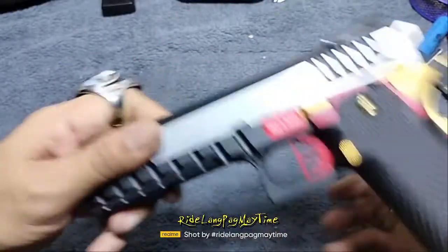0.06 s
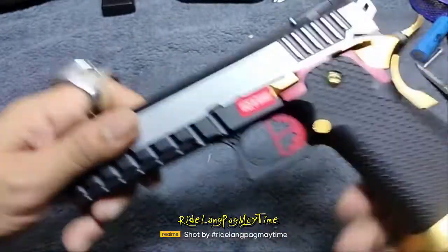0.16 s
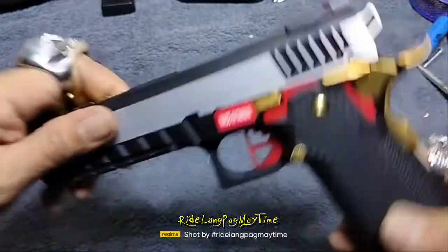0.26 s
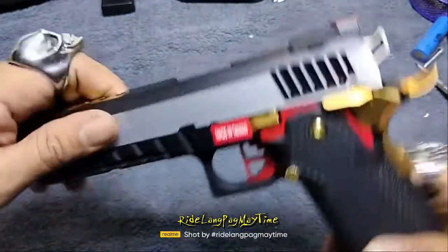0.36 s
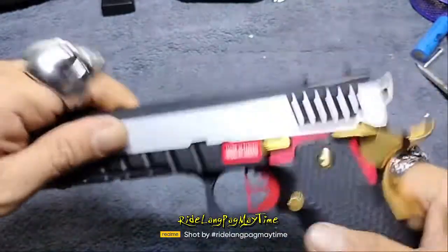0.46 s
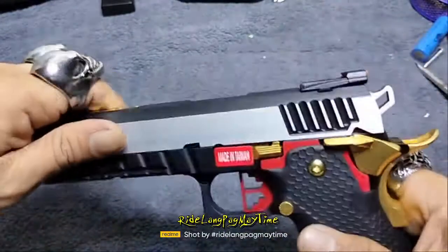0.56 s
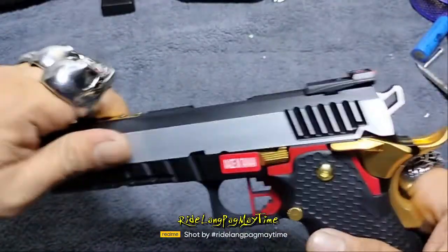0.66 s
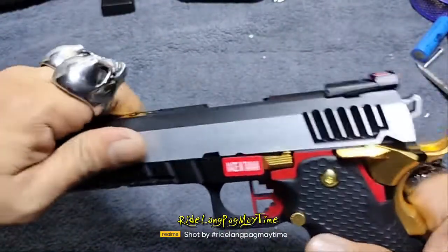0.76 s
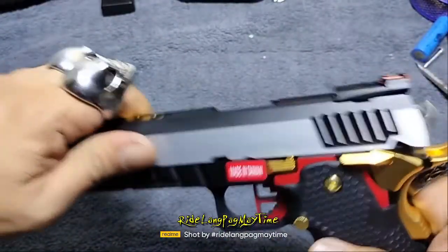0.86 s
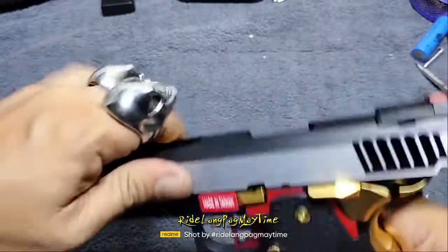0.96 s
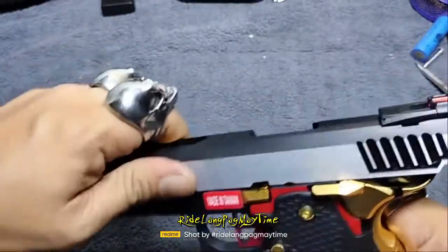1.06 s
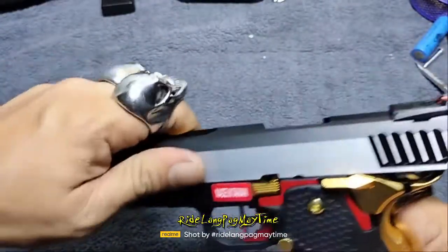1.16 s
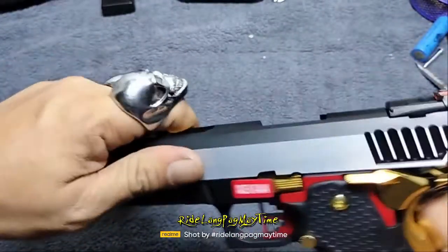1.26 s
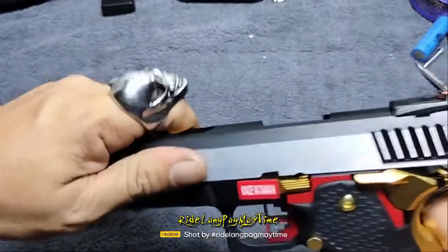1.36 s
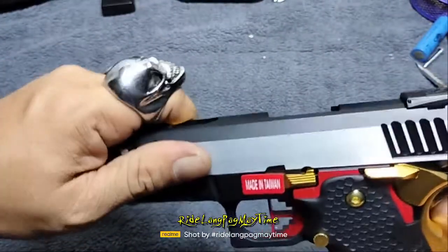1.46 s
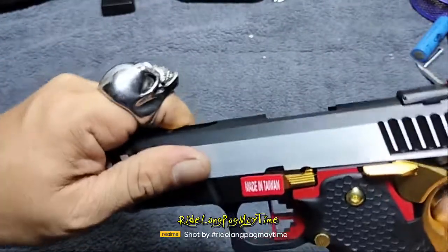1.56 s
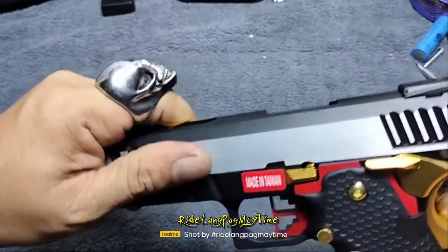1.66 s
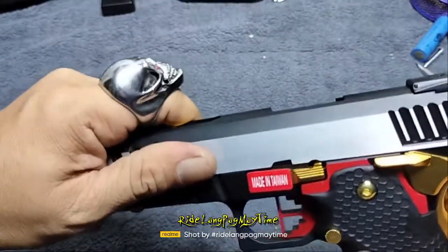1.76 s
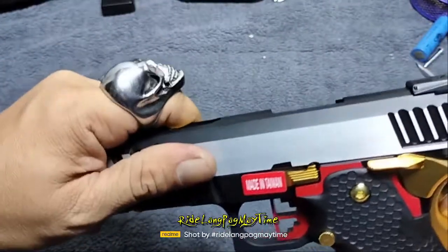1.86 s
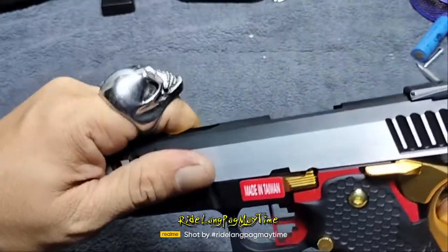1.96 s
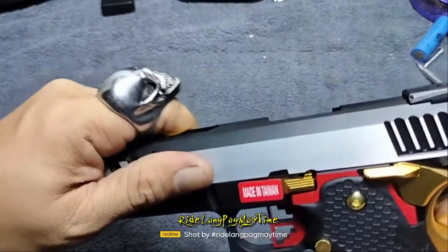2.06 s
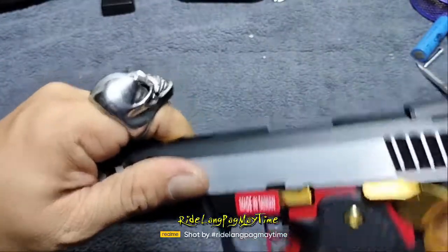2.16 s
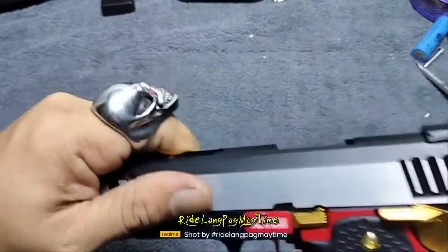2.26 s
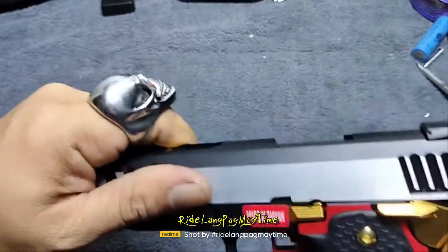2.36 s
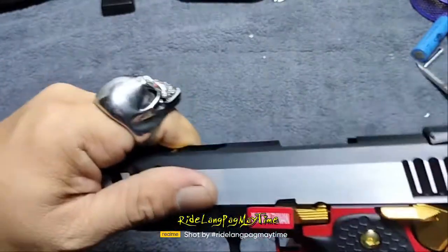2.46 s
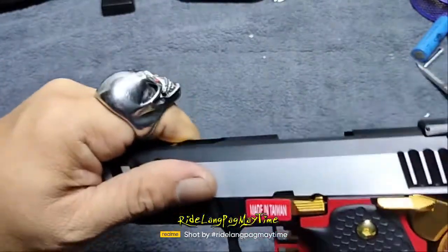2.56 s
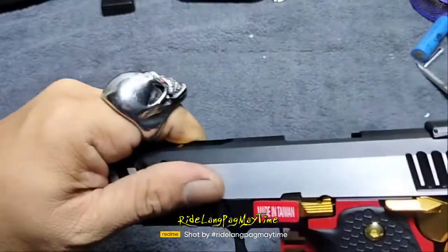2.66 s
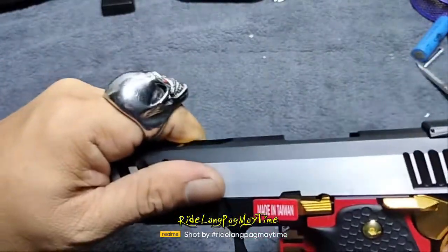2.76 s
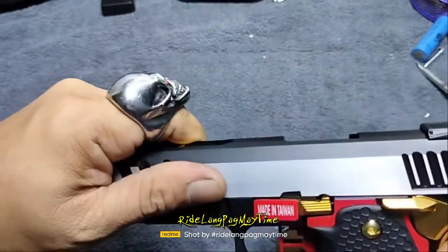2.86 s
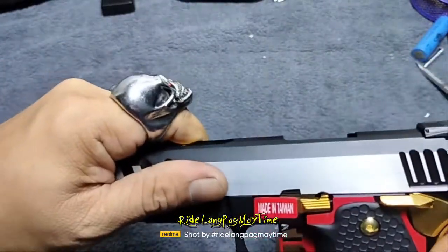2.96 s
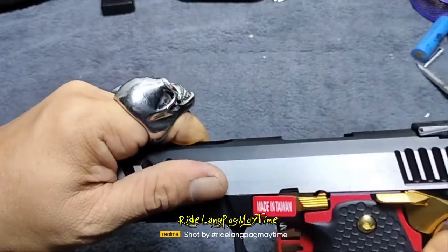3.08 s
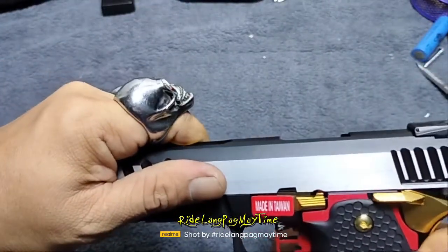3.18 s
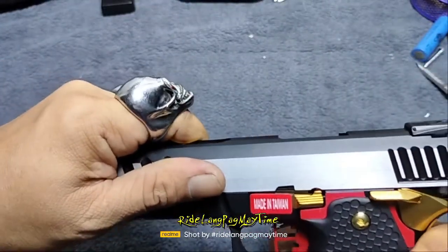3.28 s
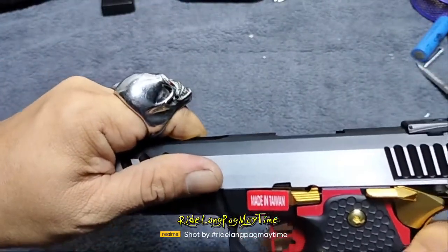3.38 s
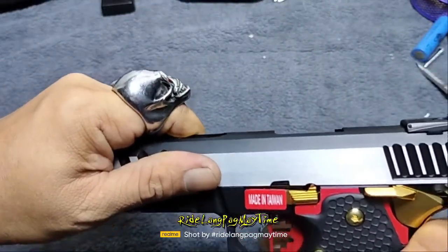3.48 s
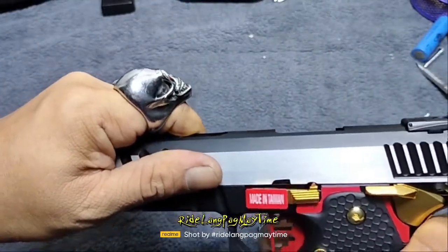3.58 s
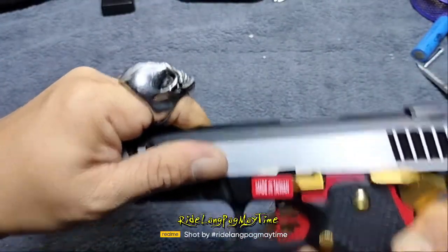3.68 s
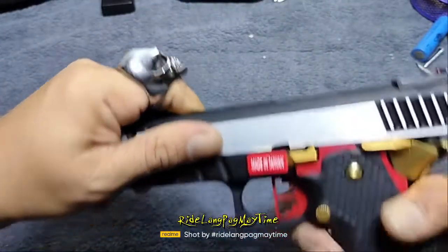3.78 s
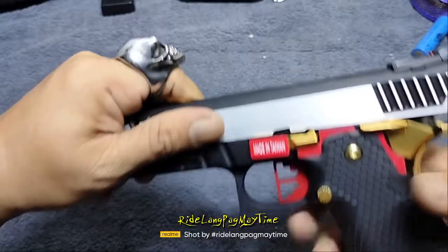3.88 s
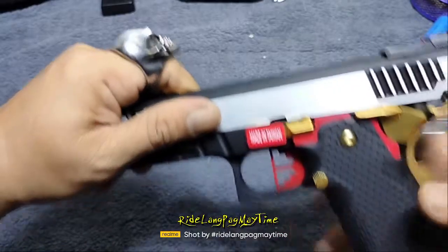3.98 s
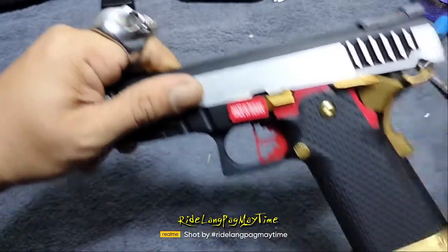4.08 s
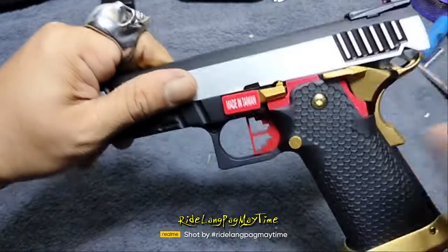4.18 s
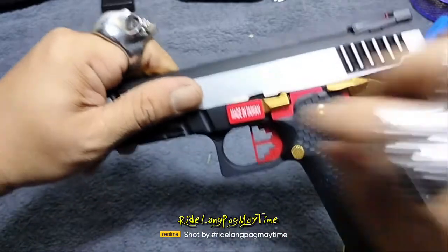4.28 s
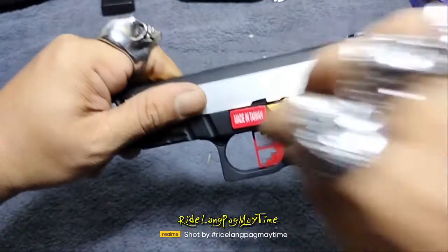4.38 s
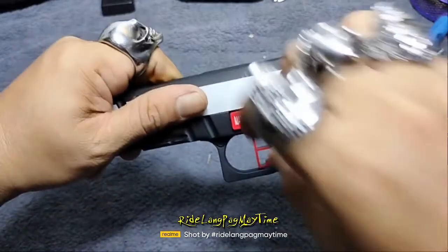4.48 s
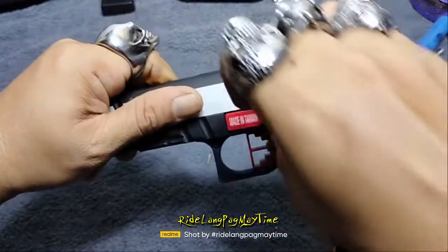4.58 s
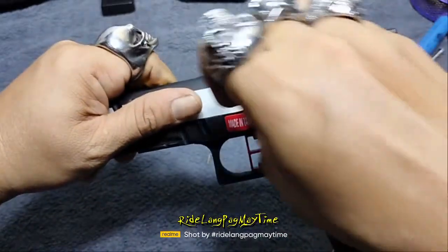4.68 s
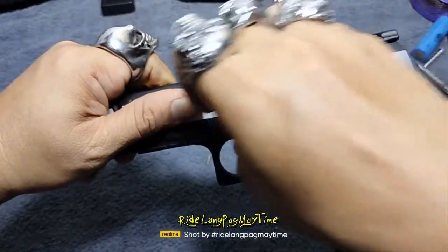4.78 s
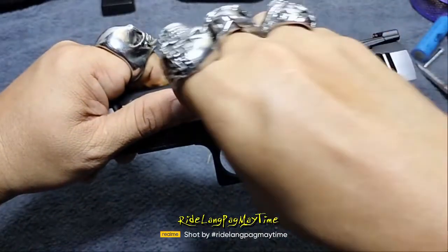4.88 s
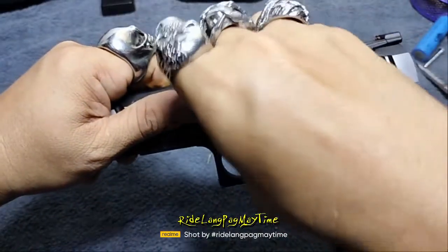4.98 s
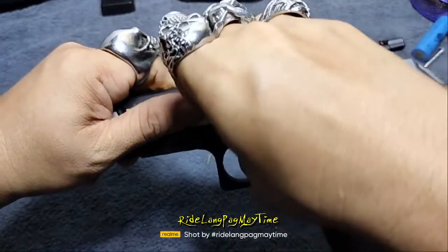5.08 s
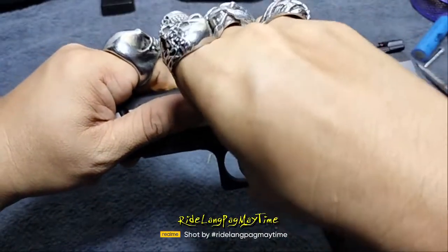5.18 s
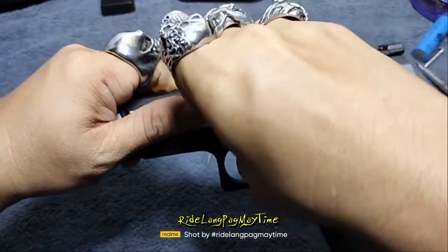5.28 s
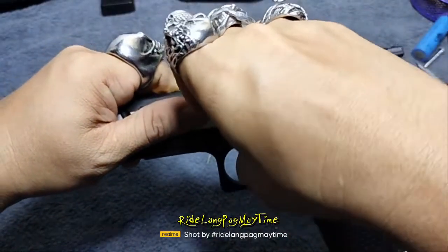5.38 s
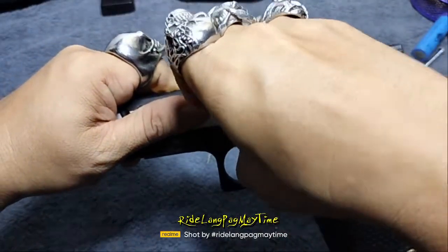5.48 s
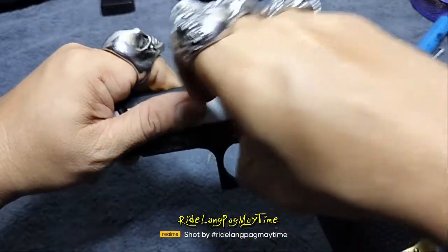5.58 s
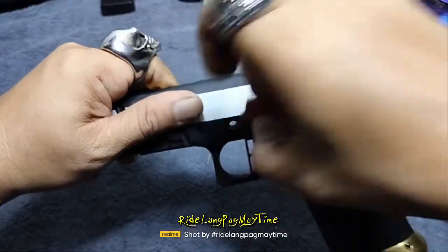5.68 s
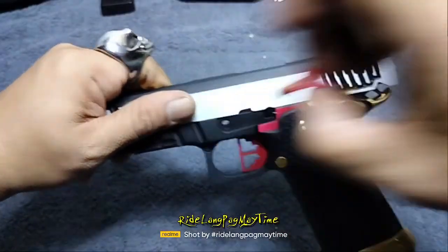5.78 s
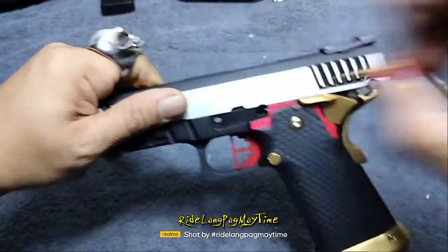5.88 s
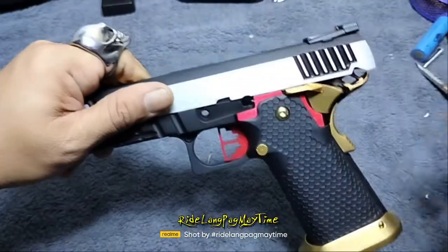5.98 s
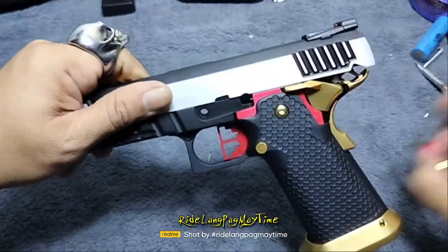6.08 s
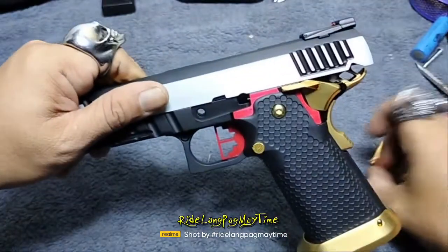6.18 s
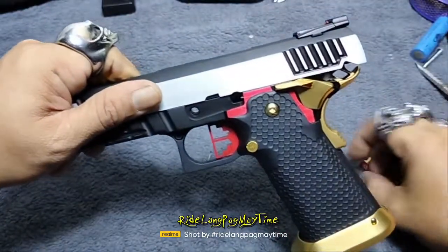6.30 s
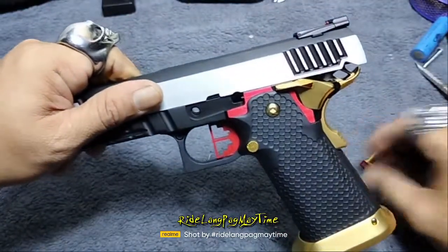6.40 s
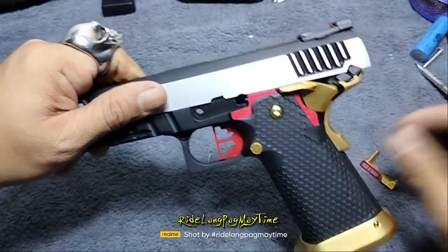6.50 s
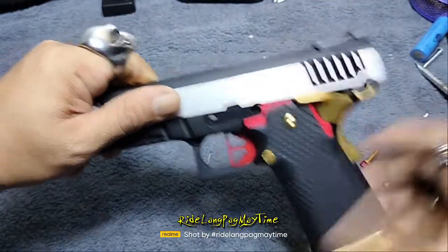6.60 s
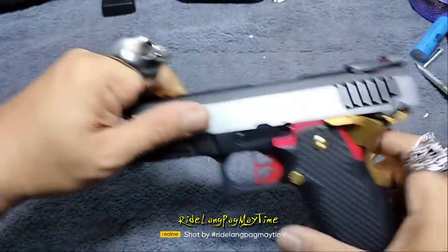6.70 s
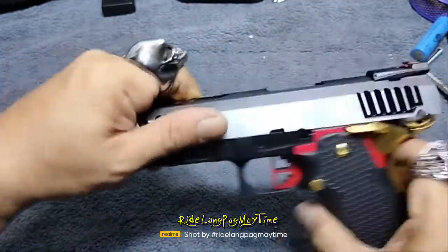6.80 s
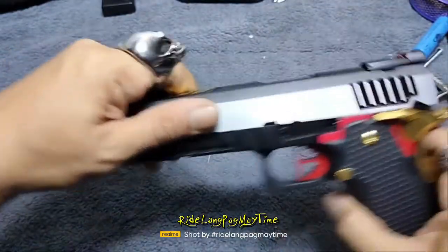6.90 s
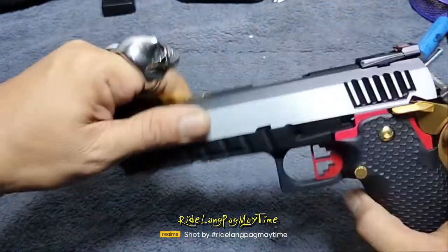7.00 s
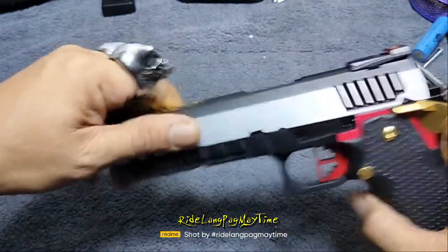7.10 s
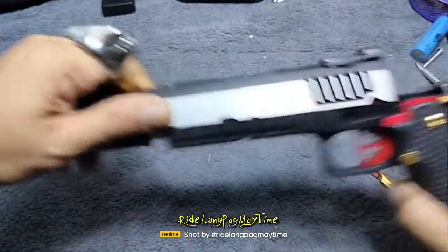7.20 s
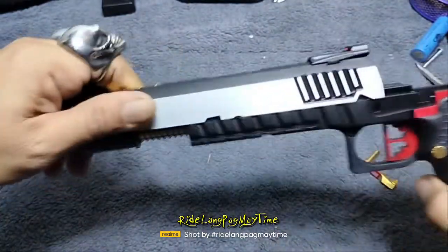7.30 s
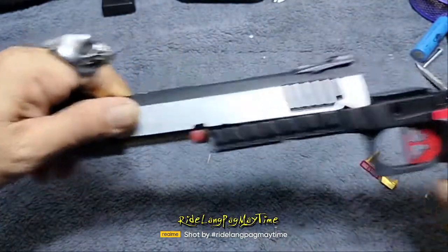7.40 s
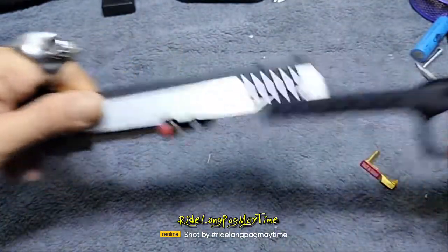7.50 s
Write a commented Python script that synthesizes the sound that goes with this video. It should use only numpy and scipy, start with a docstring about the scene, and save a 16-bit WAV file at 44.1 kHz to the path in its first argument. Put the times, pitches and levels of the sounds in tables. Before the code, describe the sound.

Hard metallic clacks and ringing clicks as a metal pistol's slide is worked, long quiet handling, then a grinding scrape as the slide is drawn off.

```python
"""Metal toy pistol worked by hand

A metal toy pistol is worked and taken apart by hand, close to a small microphone in a small soft room.
Clicks and clacks are coloured noise bursts that leave metal modes ringing; the grinding of the slide and
the rattle after hits are streams of tiny snags; fingers rub the grip as resonant noise; the butt, set down
once on a cloth-covered table, drives its low modes. Room tone, a wavering hum and a faint tone lie below."""
import sys
import numpy as np
from scipy import signal
from scipy.fft import rfft, irfft, next_fast_len
from scipy.io import wavfile
from scipy.ndimage import uniform_filter1d

SR = 44100
rng = np.random.default_rng(int(sys.argv[2]) if len(sys.argv) > 2 else 0)


def wav_record(signal):
    """Record a signal, one row per channel, as 16-bit PCM in the file named by sys.argv[1]."""
    frames = np.transpose(np.atleast_2d(signal))
    bounded = np.clip(frames, -1, 1)
    # unit amplitude maps onto the largest positive 16-bit level
    quanta = np.round(bounded * 32767).astype(np.int16)
    wavfile.write(sys.argv[1], SR, quanta)


N = 332822   # samples in the scene


def amp(db):
    """Decibel law: the gain of a level in dB."""
    return 10 ** (np.asarray(db) / 20)


def rms_one(x):
    """Normalisation: scale to rms 1."""
    return x / np.sqrt(np.mean(x ** 2) + 1e-20)


def at_hz(points, hz):
    """Interpolation on a log-frequency axis, as pitch is heard."""
    table = np.array(points)
    return np.interp(np.log(hz), np.log(table[:, 0]), table[:, 1])


def curve(rows):
    """Envelope: levels in dB joined by straight lines, as gain over time."""
    return amp(np.interp(np.arange(N) / SR, *np.transpose(rows)))


def drift(per_s):
    """Low-passed chance: a random signal of rms 1 that varies at about the given rate."""
    r = np.exp(-2 * np.pi * per_s / SR)
    white = rng.standard_normal(N + SR)
    slow = signal.lfilter([(1 - r) ** 2], [1, -2 * r, r * r], white)
    return rms_one(slow[SR:])   # the filter's first second is dropped


def bandpassed(x, low_hz, high_hz):
    """Band limitation by a Butterworth filter."""
    return signal.sosfilt(signal.butter(2, [low_hz, high_hz], "band", fs=SR, output="sos"), x)


def ring(clicks, hz, t60):
    """Damped oscillator: a unit click sets a sine of height 1 ringing, for a t60 of at least 2 ms."""
    r = amp(-60 / (max(t60, .002) * SR))
    w = 2 * np.pi * hz / SR
    return signal.lfilter([0, np.sin(w)], [1, -2 * r * np.cos(w), r * r], clicks + 1e-18)


def resonant_noise(peaks):
    """Resonance: white noise through parallel damped oscillators; rms 1."""
    white = rng.standard_normal(N)
    total = np.zeros(N)
    for k, (hz, width_hz, db) in enumerate(peaks):
        t60 = np.log(1000) / np.pi / width_hz
        total += amp(db) * width_hz * ring(white, hz, t60) * (-1) ** k
    return rms_one(total)


def coloured_noise(spectrum):
    """Spectral shaping: noise with a given spectrum; rms 1 above 220 Hz."""
    hz = np.fft.rfftfreq(N, 1 / SR) + 1
    shaped = rfft(rng.standard_normal(N)) * amp(at_hz(spectrum, hz))
    return irfft(shaped, N) / np.std(irfft(shaped * (hz > 220), N))


def evened(spectra, size):
    """Whitening: remove the broad ups and downs that chance leaves in a noise spectrum."""
    power = uniform_filter1d(np.abs(spectra) ** 2, size, axis=-1)
    return spectra / np.sqrt(power + 1e-20)


# spectrum of the room tone: (frequency [Hz], relative density [dB])
AIR_SPECTRUM = [(25, -33.5), (60, -34), (127, -11), (250, -12), (700, -18.5), (1100, -19), (2200, -29.5),
                (4400, -35), (5300, -43), (9000, -46), (16000, -55.5)]
AIR_DB = -65


def room_tone():
    """Stationary noise: the room's steady, bass-heavy hush."""
    return amp(AIR_DB) * coloured_noise(AIR_SPECTRUM)


# wavering of the hum: (time [s], level [dB])
HUM_LEVEL = [(0.0, -63), (1.0, -61.5), (3.21, -64.5), (4.28, -61), (4.45, -54.5), (7.04, -60.5),
             (7.55, -54)]
# broad resonances of the hum: (frequency [Hz], width [Hz], relative level [dB])
HUM_PEAKS = [(116, 37, 2.5), (145, 99, -4.5), (70, 25, -14.5)]


def hum():
    """Narrow-band noise: a low hum whose level wavers."""
    return curve(HUM_LEVEL) * resonant_noise(HUM_PEAKS)


# swells of the faint tone: (middle [s], half length [s], level [dB])
TONE_SWELLS = [(3.595, 0.3, -63.5), (7.41, 0.27, -53.5)]
TONE_HZ, TONE_WIDTH_HZ = 745, 30


def faint_tone():
    """Narrow-band noise: a faint tone that comes and goes in parabolic swells."""
    t = np.arange(N) / SR
    swell = sum(amp(db) * np.clip(1 - ((t - s) / half_s) ** 2, 0, 1) for s, half_s, db in TONE_SWELLS)
    return swell * resonant_noise([(TONE_HZ, TONE_WIDTH_HZ, 0)])


def background():
    """Superposition of room tone, hum and faint tone."""
    return room_tone() + hum() + faint_tone()


# loudness of the rubbing: (time [s], level [dB])
RUB_LEVEL = [(3.1, -90.5), (3.3, -77), (3.7, -92), (3.85, -77), (4.0, -72), (4.1, -59.5), (4.22, -74),
             (4.33, -64.5), (4.45, -72), (4.65, -90.5), (5.34, -92.5), (5.38, -72), (5.6, -77.5),
             (5.7, -92.5), (5.95, -95), (6.15, -79), (6.55, -77.5), (6.7, -100)]
# resonances of the grip: (frequency [Hz], width [Hz], relative level [dB])
GRIP_PEAKS = [(2810, 220, -5), (4200, 480, -3.5), (7500, 1200, -8.5), (13280, 480, -13), (15770, 710, -21)]
RUB_BROAD_DB = -16
RUB_PATCHY_DB, RUB_PATCHES_PER_S = 3, 4


def fingers():
    """Friction noise: skin slides unevenly over the textured grip, a hiss that shows its resonances."""
    hiss = amp(RUB_BROAD_DB) * bandpassed(rng.standard_normal(N), 2000, 12000)
    for hz, width_hz, db in GRIP_PEAKS:
        patchy = amp(db + RUB_PATCHY_DB * drift(RUB_PATCHES_PER_S))
        hiss = hiss + patchy * resonant_noise([(hz, width_hz, 0)])
    return curve(RUB_LEVEL) * hiss


# pulses of force as the butt is set down: (time [s], force [dB])
BUTT_DOWN = [(4.31, -57), (4.323, -59), (4.399, -74.5)]
# modes of the table: (frequency [Hz], relative level [dB], t60 [s])
TABLE_MODES = [(176.5, -1, 0.07), (237, -3.5, 0.13), (311, 3.5, 0.02), (465, 2, 0.043), (630, 9.5, 0.0026)]
PRESS_S = 0.016   # time constant of each pulse


def butt():
    """Forced vibration: a soft, drawn-out contact through cloth excites only the table's low modes."""
    force = np.zeros(N)
    t = np.arange(2000) / SR
    for s, db in BUTT_DOWN:
        pulse = rng.standard_normal(len(t)) * np.exp(-t / PRESS_S)
        force[round(s * SR):][:len(t)] += amp(db) * pulse
    thud = sum(amp(db) * ring(force, hz, t60) * (-1) ** k for k, (hz, db, t60) in enumerate(TABLE_MODES))
    return bandpassed(thud, 140, 900)


# colour of the pistol's many short-lived modes as heard close by: (frequency [Hz], gain [dB])
BODY = [(300, -46), (580, -13.5), (950, -4.5), (1300, 5.5), (2200, -0.5), (3500, -2), (4800, -2),
        (5900, -9), (7200, -6.5), (8400, 2), (9200, -3.5), (10500, -11.5), (12500, -12.5), (15500, -12)]


def body_db(hz):
    """Modal overlap: many short-lived modes merge into one smooth colour, in dB."""
    return at_hz(BODY, hz)


# centres of the low, middle and high register: (frequency [Hz])
REGISTERS_HZ = [1300, 3300, 8000]


def shares(hz):
    """Crossover: how much a frequency belongs to the low, middle and high register."""
    return np.array([np.interp(np.log(hz), np.log(REGISTERS_HZ), row) for row in np.eye(3)])


RISE_DB = 29   # climbed within the rise time
SETTLE_DB_PER_DECADE = 35.5
END_FADE_S = 0.02028   # linear fade at the end


def swell_and_settle(s, db, rise_s, settle_s, lasts_s):
    """Swell and settling: a grind or the rattle after a hit rises quickly, dies fast, then slowly."""
    t = np.arange(N) / SR - s
    fall_db = SETTLE_DB_PER_DECADE * np.log10(1 + np.maximum(t, 0) / max(settle_s, .001))
    rise_db = np.minimum(RISE_DB * np.maximum(-t, 0) / max(rise_s, .001), 200)
    end_fade = np.clip((lasts_s + END_FADE_S - t) / END_FADE_S, 0, 1)
    return amp(db - fall_db - rise_db) * end_fade


# grinds and after-hit rattles:
# (loudest at [s], level [dB], rise [s], settling time [s], lasts [s], treble against middle [dB])
GRINDS_AND_RATTLES = [(0.001, -29, 0.016, 0.025, 0.2, -6.5), (0.424, -22, 0.0015, 0.0068, .13, -14),
                      (0.729, -33, .002, 0.037, 0.2, -8), (1.238, -39.5, 0.045, 0.1, 0.055, -6.5),
                      (2.156, -51.5, 0.1, 0.06, 0.16, -8.5), (6.963, -41.5, 0.21, 0.47, 0.048, -12),
                      (7.004, -17, 0.014, 0.012, 0.11, -10.5)]
# the slide is drawn off the frame: (time [s], level [dB], treble against middle [dB])
DRAWN_OFF = [(7.15, -63, -12.5), (7.19, -32.5, -16), (7.23, -22, -13), (7.295, -26, -12.5),
             (7.32, -33, -17), (7.42, -46, -21), (7.48, -35.5, -10), (7.547, -57, -14)]
# rail modes that the snags keep alive: (frequency [Hz], relative level [dB], t60 [s])
RAIL_MODES = [(1474, -30, 0.01), (2050, -27, 0.0077), (2620, -29.5, 0.016), (3824, -31.5, .015)]
SNAGS_PER_S, SNAG_SPREAD_DB = 3000, 3.2
LUMPS_DB, LUMPS_PER_S = 2.2, 61
GRIND_BASS_DB = -5.5   # low register against the middle
WAVER_DB, WAVER_PER_S = 4, 30   # the level of each mode wavers at random


def grind_and_rattle():
    """Roughness excitation: a dense, lumpy stream of tiny snags, coloured by the body, rings the rails."""
    s, level_db, treble_db = np.transpose(DRAWN_OFF)
    drawn = curve(np.c_[s, level_db]) * (np.arange(N) > s[0] * SR)
    moves = [(swell_and_settle(*row[:-1]), amp(row[-1])) for row in GRINDS_AND_RATTLES]
    moves.append((drawn, curve(np.c_[s, treble_db])))
    middle = sum(gain for gain, treble_share in moves)
    treble = sum(gain * treble_share for gain, treble_share in moves)

    happens = rng.random(N) < SNAGS_PER_S / SR
    heights = amp(SNAG_SPREAD_DB * np.minimum(rng.exponential(1, N), 4))
    snags = happens * heights * rng.choice([-1, 1], N)
    snags = rms_one(snags * amp(LUMPS_DB * drift(LUMPS_PER_S)))

    size = next_fast_len(N)
    hz = np.fft.rfftfreq(size, 1 / SR) + 1
    gains = np.array([middle * amp(GRIND_BASS_DB), middle, treble])
    registers = rfft(snags * gains, size) * shares(hz)
    rasp = irfft(registers.sum(axis=0) * amp(body_db(hz)), size)[:N]
    rails = sum(amp(db + WAVER_DB * drift(WAVER_PER_S / 2)) * ring(rasp, hz, t60)
                for hz, db, t60 in RAIL_MODES)
    return rasp + rails


# metal contacts, heard both as bursts and as the blows that ring the modes:
# (time [s], relative level [dB], below the peak [dB], above the peak [dB], strongest pitch [Hz])
CONTACTS = [(0.0133, -24.5, -19, 0.5, 2520), (0.049, -21.5, -3.5, -24, 810), (0.111, -34, -2, -28, 2300),
            (0.159, -49, 3, 7, 2130), (0.189, -39, 0, -5, 3350), (0.218, -26, 1, -18.5, 2400),
            (0.265, -33.5, 2.5, -18, 2000), (0.314, -37, -6, 5, 3160), (0.365, -34.5, -7, -37, 1040),
            (0.428, -2.5, -10.5, -11.5, 2160), (0.44, -37, 10, -24, 2300), (0.447, -30, 3, -19, 3050),
            (0.4619, -14, -3, 0, 3300), (0.4654, -16.5, 5.5, -2.5, 3200), (0.551, -33.5, 4, -10, 3700),
            (0.5702, -23.5, -9, -2.5, 2870), (0.664, -25, -7.5, -20.5, 2650), (0.6728, -27, -2, -14, 2120),
            (0.7279, -16.5, -18, 0, 3700), (0.7452, -20.5, 2, -22, 3400), (0.7573, -17, -35, -11, 2700),
            (0.832, -58, -14, 23, 4500), (0.865, -29.5, -2, -16, 4260), (0.8733, -23.5, 4.5, -5.5, 4400),
            (0.8926, -9.5, -10.5, -2, 3500), (0.9111, -3.5, -6, -2, 3420), (0.916, -18, -5, -10, 3000),
            (0.9274, -2, -4, -4.5, 3970), (0.9306, -15, 0, -2, 3440), (0.948, -4.5, -13, -1.5, 2406),
            (0.95, -3, -3.5, -3, 2895), (0.954, -8, -0.5, -9, 2289), (1.221, -45.5, 2, -12, 1990),
            (1.266, -24.5, -1, -9, 1890), (1.29, -39.5, 3.5, -7.5, 2010), (1.338, -33, -4.5, -11, 2204),
            (1.4685, -48.5, -12, -13.5, 2200), (1.675, -38.5, 0, -15.5, 2210),
            (1.8622, -30.5, -6, -10.5, 4200), (1.913, -44.5, -14, -5.5, 2320),
            (1.986, -42.5, -4.5, -13, 1969), (3.249, -43, -13.5, -6, 3720),
            (3.4255, -38.5, 2.5, -16.5, 3520), (3.5442, -20.5, -11.5, 0, 3480), (3.564, -40, 6, -22, 2840),
            (3.609, -49.5, 8.5, -16, 2010), (3.741, -58.5, 12.5, -17, 1930),
            (3.786, -55.5, 11.5, -26, 2104), (3.834, -49.5, -12, -10.5, 2620),
            (4.048, -47, -12, -13.5, 3020), (4.174, -39, -7, -9, 2920), (4.4028, -49.5, 8.5, -19, 3150),
            (4.5224, -35.5, -15.5, -7, 2306), (5.3666, -43, -2, 1, 3760),
            (6.3075, -59.5, 11.5, -12.5, 2004), (6.553, -50.5, 6.5, -16.5, 2193),
            (6.647, -48.5, -11.5, 6, 2000), (6.669, -27, -9, -19, 3250), (6.672, -9.5, 1, -26, 1350),
            (6.676, -11, -7.5, -21, 1380), (6.766, -30.5, -0.5, 1.5, 2280), (6.901, -26.5, -32, -20, 2680),
            (6.919, -31, -15, -8, 4380), (6.927, -26.5, -3.5, -12.5, 2450), (6.9981, -17, -16, -27, 2560),
            (7.0039, -13, -6.5, -9.5, 1990), (7.0135, -2, -21, -14, 1870), (7.147, -34.5, -9, -1.5, 2700),
            (7.18, -24.5, -9, -11, 3220), (7.186, -23.5, -10, -2.5, 3370), (7.213, -15, -9, -8, 1860),
            (7.224, -15, -1.5, -6.5, 1900), (7.2473, -15, -0.5, -19, 2550), (7.268, -15, -3.5, -33, 1950),
            (7.2923, -15.5, -17, -19, 1543), (7.386, -26.5, 2, -54, 1940), (7.41, -35.5, -20, -11, 4000),
            (7.472, -42, 11, -14, 2380), (7.507, -31.5, -7, -27, 2330), (7.531, -21, 3.5, -9, 3000)]
# long modes of the slide: (frequency [Hz], relative level [dB], t60 [s])
SLIDE_MODES = [(1330, -5, 0.12), (1250, -4, 0.05), (1430, -3, 0.05), (3290, 5, 0.027), (4000, 1, .04),
               (8050, -3, 0.03), (8520, -2, .11), (10350, -8, .09)]
# modes of the hammer spring: (frequency [Hz], relative level [dB], t60 [s])
SPRING_MODES = [(2715, 2, .13), (2772, 2, .19), (2925, 3, .11)]
COCKING_FROM_S, COCKING_TO_S = .56, .8   # the spring rings only while the thumb cocks it
RING_LOW_DB, RING_MIDDLE_DB, RING_TOP_DB = -19.5, -19.5, -28.5
RING_DULL_DB_PER_DB = 1.93   # dull blows land squarely and ring the low modes more
RING_LOSS_DB_PER_OCTAVE = 170   # away from the blow's pitch
SQUARE_DB = 13   # a blow right on a low mode's pitch rings it harder
SOFT_RING_DB_PER_DB = 0.24   # light taps let the top modes ring more freely


def slide_ring():
    """Modal excitation: every blow leaves the slide's long modes ringing, and the spring's while free."""
    s, blow_db, below, above, peak_hz = np.transpose(CONTACTS)
    cocking = (s > COCKING_FROM_S) & (s < COCKING_TO_S)
    modes = [*SLIDE_MODES, *SPRING_MODES]
    signs = rng.choice([-1, 1], (len(s), len(modes)))
    out = np.zeros(N)
    for k, (hz, db, t60) in enumerate(modes):
        near_db = RING_MIDDLE_DB - RING_LOSS_DB_PER_OCTAVE * np.abs(np.log2(hz / peak_hz))
        if hz < 2000:
            reach_db = np.maximum(RING_DULL_DB_PER_DB * below + RING_LOW_DB, near_db + SQUARE_DB)
        elif hz > 6000:
            reach_db = np.minimum(above, 5) + RING_TOP_DB - SOFT_RING_DB_PER_DB * blow_db
        else:
            reach_db = near_db
        free = True if k < len(SLIDE_MODES) else cocking
        clicks = np.zeros(N)
        clicks[np.round(s * SR).astype(int)] = amp(db + blow_db + reach_db) * signs[:, k] * free
        out += ring(clicks, hz, t60) * amp(WAVER_DB * (drift(WAVER_PER_S) - .5))
    return signal.sosfilt(signal.butter(2, 900, "high", fs=SR, output="sos"), out)


CRACK_DB, UNEVEN_DB = 19, 2.5   # gain of all bursts; spread of their colour
CHATTER_MS, CHATTER_MS_PER_DB = 1.3, -0.01   # decay constant; softer blows chatter a little longer
BITE_MS = .25   # time constant with which a contact bites
PEAK_DB, PEAK_OCTAVES = 6.5, 0.2   # the struck part's own short resonance
SOFT_DULL_DB_PER_DB = 0.2   # softer blows lose more of the top octave


def landing_db(hz, db, below, above, peak_hz):
    """Contact spectrum: where a blow lands sets its strongest pitch and the slopes on either side."""
    low_hz, high_hz = REGISTERS_HZ[0], REGISTERS_HZ[-1]
    corners_hz = [min(low_hz, peak_hz / 2.0), peak_hz, high_hz, 2 * high_hz]
    levels = [db + below, db, db + above, db + above + SOFT_DULL_DB_PER_DB * db]
    slopes = np.interp(np.log(hz), np.log(corners_hz), levels)
    return slopes + PEAK_DB * np.exp(-.5 * (np.log2(hz / peak_hz) / PEAK_OCTAVES) ** 2)


def contacts():
    """Impact noise: each contact chatters as a dying burst, coloured by the body and where it lands."""
    table = np.array(CONTACTS)
    span = np.arange(1024)   # samples of one burst
    hz = np.fft.rfftfreq(len(span), 1 / SR) + 1
    landing = np.array([landing_db(hz, *row[1:]) for row in table])
    # chance favours other parts of the spectrum at every contact
    favour_hz = np.geomspace(500, 16000, 24)
    luck = rng.standard_normal((len(table), len(favour_hz)))
    favour = np.array([np.interp(np.log(hz), np.log(favour_hz), row) for row in luck])
    colour_db = landing + UNEVEN_DB * favour + body_db(hz) + CRACK_DB

    # folding the cepstrum makes the colouring causal: nothing sounds before the blow
    half = len(span) // 2 - 1
    fold = np.r_[1, 2 * np.ones(half), 1, np.zeros(half)]
    colour = np.exp(rfft(irfft(np.log(amp(colour_db))) * fold))

    chatter = np.clip(CHATTER_MS + CHATTER_MS_PER_DB * table[:, 1:2], .3, 4) * SR / 1000
    bite = 1 - np.exp(-span / SR * 1000 / BITE_MS)
    noise = rng.standard_normal((len(table), len(span))) * np.exp(-span / chatter) * bite
    bursts = irfft(evened(rfft(noise), size=15) * colour)
    bursts = bursts * np.cos(span / len(span) * np.pi / 2) ** 2   # fades to silence
    at = np.round(table[:, :1] * SR).astype(int) + span
    return np.bincount(at.ravel(), bursts.ravel(), N + len(span))[:N]


def pistol():
    """Superposition of all that the metal parts do."""
    return grind_and_rattle() + slide_ring() + contacts()


# decay of the room: (frequency [Hz], t60 [s])
ROOM_DECAY = [(500, 0.26), (1300, 0.045), (3500, 0.24), (15000, 0.15)]
ROOM_DB = -7.5


def room(x):
    """Diffuse reverberation: noise that builds up as the walls answer and dies band by band."""
    t = np.arange(SR // 2) / SR
    tail = np.zeros(len(t))
    edges = 300 * 2 ** np.arange(0, 6, .5)   # half octaves [Hz]
    for low, high in zip(edges, np.append(edges[1:], 17000)):
        band = bandpassed(rng.standard_normal(len(t)), low, high)
        tail += band * amp(-60 * t / at_hz(ROOM_DECAY, np.sqrt(low * high)))
    tail *= 1 - np.exp(-t / .006)
    tail = irfft(evened(rfft(tail), size=70)) * (t < .4)
    return signal.fftconvolve(x, tail / np.sqrt(np.sum(tail ** 2)))[:N]


def scene():
    """Superposition: pistol and butt with their reflections, then the fingers and the background."""
    near = pistol() + butt()
    return (near + amp(ROOM_DB) * room(near) + fingers() + background())[None]


MIC_LOW_HZ, CUTOFF_HZ = 43.75, 16800   # deep bass falls below the first; the top is gone at the second
TOP = .97   # ceiling towards which peaks are rounded


def record(dry):
    """Band limits and saturation: deep bass is dropped, the loudest peaks are rounded, the top is cut."""
    dry = signal.sosfilt(signal.butter(4, MIC_LOW_HZ, "high", fs=SR, output="sos"), dry)
    rounded = dry / (1 + np.abs(dry / TOP) ** 4) ** (1 / 4)
    return TOP * signal.sosfilt(signal.cheby2(12, 60, CUTOFF_HZ, fs=SR, output="sos"), rounded)


dry = scene()
out = record(dry)
wav_record(out)
```